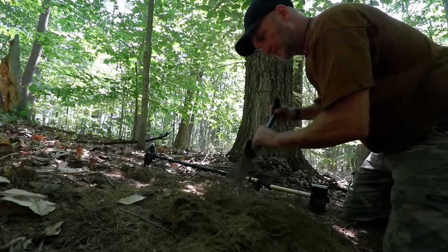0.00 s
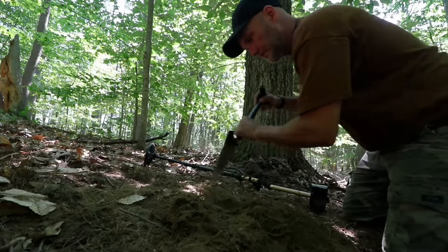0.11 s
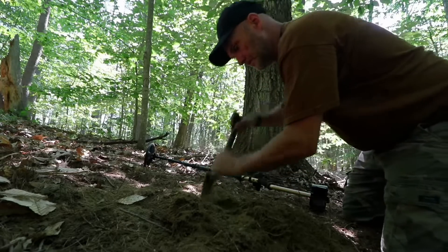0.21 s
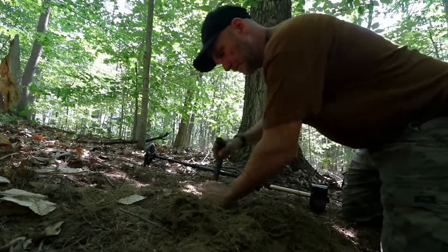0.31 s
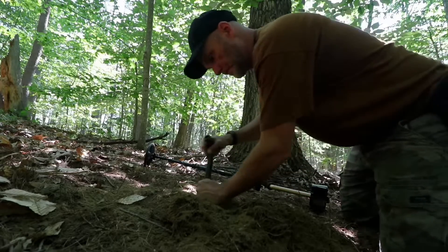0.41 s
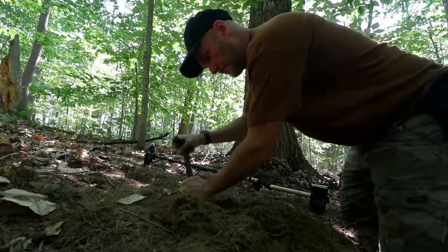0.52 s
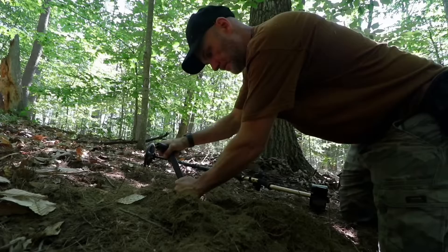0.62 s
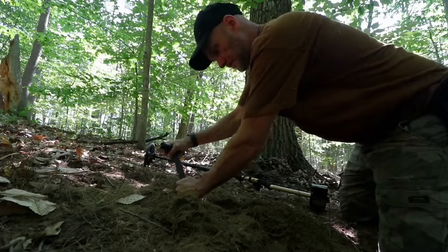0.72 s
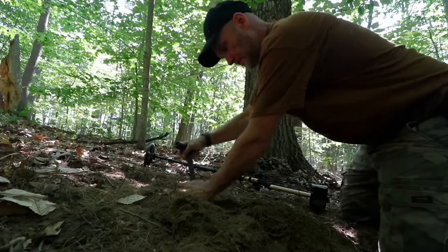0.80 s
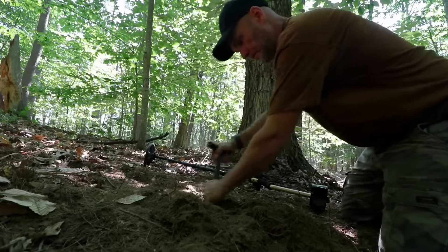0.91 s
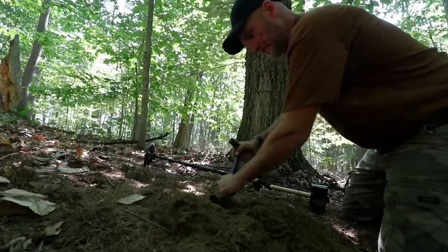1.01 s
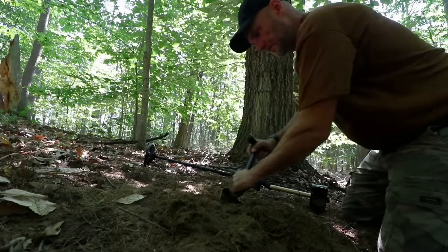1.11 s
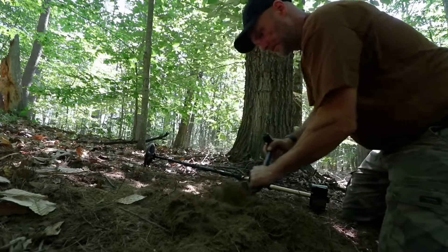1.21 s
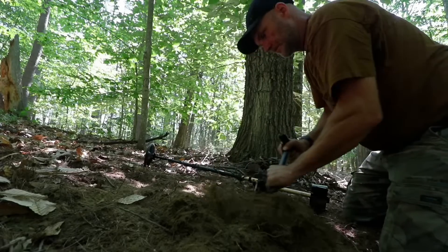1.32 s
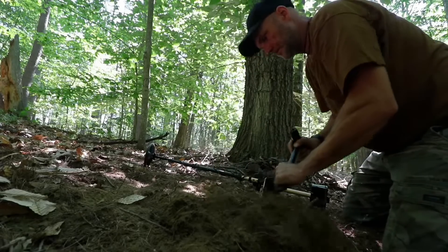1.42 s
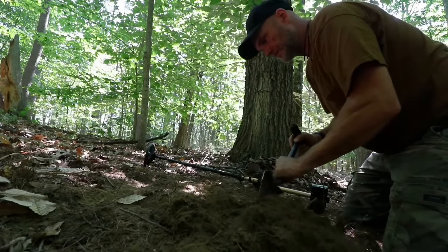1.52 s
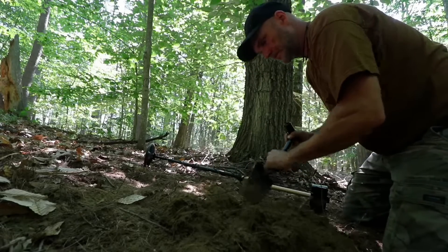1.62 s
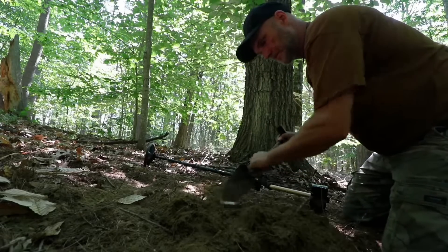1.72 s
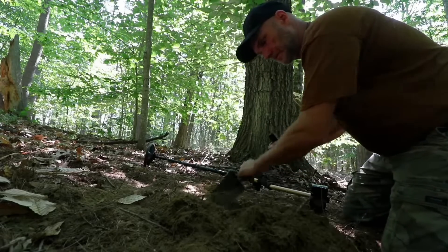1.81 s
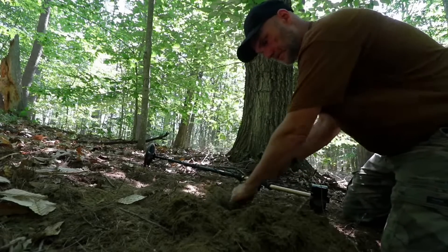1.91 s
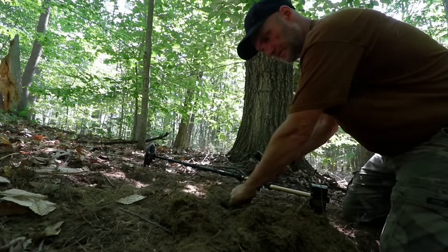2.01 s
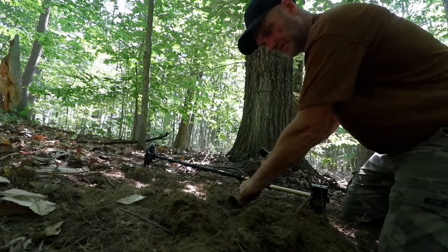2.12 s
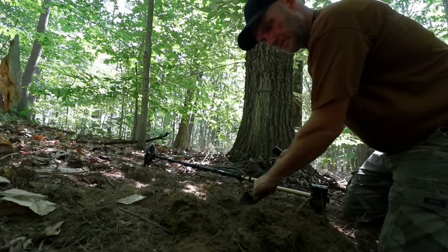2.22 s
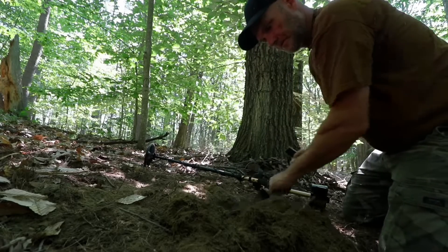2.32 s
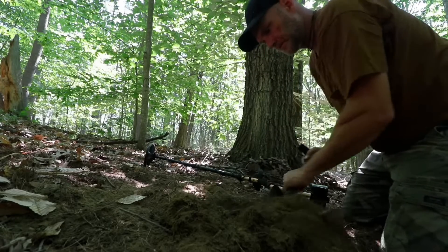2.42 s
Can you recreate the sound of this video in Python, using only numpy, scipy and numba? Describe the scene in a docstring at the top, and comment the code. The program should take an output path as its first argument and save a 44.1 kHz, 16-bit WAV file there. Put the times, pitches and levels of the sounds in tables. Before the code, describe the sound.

Steel blade hits glass and metal scraps in earth with a harsh double crack and thud, drags through crumbling grit with brief squeaks, then clinks again; close and dry outdoors, over faint leaf hush.

```python
"""Woodland soil full of glass and metal scraps, chopped and dragged through by a steel blade near a small
camera. Knocks pair a noise crack with damped blade and shard modes; chatters and grit are random clicks into
the same modes. Thuds and ticks are short sine swells, squeals narrow noise; two blade tones fade from the
stroke before. Filtered noise gives leaf hush, far drone, insects and wind. The camera hears almost in mono,
turns its gain down when loud and clips at full scale."""
import sys
import numpy as np
from scipy import signal
from scipy.fft import rfft, irfft
from scipy.io import wavfile
from numba import njit

SR = 44100
rng = np.random.default_rng(int(sys.argv[2]) if len(sys.argv) > 2 else 0)


def ratio(d):
    """dB to gain"""
    e = np.asarray(d, float) / 20
    return 10 ** e


def output_pcm(signal):
    """Save a mono or channel-first signal as 16-bit PCM at the path in sys.argv[1].

    Samples are clipped to [-1, 1] before scaling.
    """
    pcm = np.clip(np.atleast_2d(signal).T, -1, 1) * 32767
    wavfile.write(sys.argv[1], SR, np.round(pcm).astype(np.int16))


N = 110250


def unit(x):
    """Scale to rms 1."""
    return x / np.sqrt(np.mean(x ** 2))


def colour(x, table):
    """Minimum-phase filter through (hz, db) points, by folded cepstrum."""
    hz, db = np.array(table, float).T
    bin_hz = np.arange(2049) * SR / 4096
    log_gain = np.interp(np.log(bin_hz + 1), np.log(hz), db) * np.log(10) / 20
    cepstrum = irfft(log_gain)
    cepstrum[1:2048] *= 2
    cepstrum[2049:] = 0
    impulse = irfft(np.exp(rfft(cepstrum)))
    return signal.fftconvolve(x, impulse)[:len(x)]


def band(x, hz, width_hz):
    """One resonance."""
    return signal.lfilter(*signal.iirpeak(hz, hz / width_hz, fs=SR), x)


def grains(per_s, spread_db, size=N):
    """Random clicks whose sizes have a long tail."""
    hit = rng.random(size) < per_s / SR
    size_gain = ratio(spread_db * rng.exponential(size=size))
    return hit * rng.standard_normal(size) * size_gain


def curve(table, column):
    """A dB column as gain over time."""
    points = np.array(table)
    return ratio(np.interp(np.arange(N) / SR, points[:, 0], points[:, column]))


def add(out, start_s, x):
    """Mix x in from start_s."""
    i = max(int(start_s * SR), 0)
    out[i:i + len(x)] += x[:N - i]


def decay(t, t60_s):
    """Exponential fade, 60 dB in t60_s."""
    return np.exp(-np.log(1000) * t / t60_s)


# leaf hush spectrum: hz [Hz], density_db [relative dB per Hz]
HUSH_SPECTRUM = [(25, -21.5), (107, -4.5), (523, -13.5), (2420, -21.5), (3440, -19.5), (5140, -34.5),
                 (15500, -37)]
# wind on the microphone: time_s [s], level_db [dB rms]
WIND_LEVEL = [(0, -93), (.25, -41), (.8, -62), (1.05, -44), (1.6, -65), (2.2, -43.5), (2.5, -57)]


def forest():
    """Leaf hush, a far drone, a thin insect band and low wind rumble, all filtered noise."""
    noise = rng.standard_normal((4, N))
    hush = ratio(-47) * unit(colour(noise[0], HUSH_SPECTRUM))
    drone = ratio(-54) * unit(band(noise[1], hz=86, width_hz=15))
    insects = ratio(-60.5) * unit(band(noise[2], hz=3400, width_hz=37))
    rumble_band = signal.butter(2, [22, 55], "band", fs=SR, output="sos")
    wind = curve(WIND_LEVEL, column=1) * unit(signal.sosfilt(rumble_band, noise[3]))
    return hush + drone + insects + wind


# blade tones left from the stroke before: pitch_hz [Hz], level_db [dB peak], t60_s [s]
AFTER_TONES = [(2560, -41, 0.27), (2210, -46, 0.15)]


def after_ring():
    """Two blade tones dying away exponentially."""
    t = np.arange(N) / SR
    out = np.zeros(N)
    for pitch_hz, level_db, t60_s in AFTER_TONES:
        out += ratio(level_db) * decay(t, t60_s) * np.sin(2 * np.pi * pitch_hz * t)
    return out


# mode pitches, blade plus a struck glass or metal shard (1655, 2360, 3150, 3970 Hz): pitch_hz [Hz]
MODE_HZ = [850, 1320, 1550, 1655, 2210, 2360, 2450, 2600, 3150, 3230, 3465, 3970, 4060, 4560, 5030, 5930,
           6610, 7800, 8200, 9300, 11100, 13400]
# per mode: edge_db [dB, struck on the edge], face_db [dB, struck on the face], t60_s [s, free]
MODE_RESPONSE = [(-5.5, -3.5, 0.014), (-14, -7, 0.29), (-11, 1, 0.23), (-1.5, -1, 0.094), (-9, -4.5, 0.23),
                 (-5, -29, 0.054), (-5, -2.5, 0.09), (-5.5, -3, 0.039), (2, -14, 0.051), (-9.5, -7, 0.19),
                 (-2.5, -3.5, 0.29), (-0.5, -48, 0.18), (-4, -30.5, 0.8), (-20, 0.5, 0.25),
                 (-8.5, -15, 0.16), (-11.5, -10.5, 0.088), (-2, -17.5, 0.17), (-12, -49, 0.2),
                 (-5.5, -32, 0.14), (-1, -58, 0.088), (-19.5, -29.5, 0.066), (-18, -27, 0.015)]
MODE_SCATTER_DB, FAVOUR_DB, FAVOUR_OCTAVES = 2.5, 14, 0.16


def ring(face, held_s, tilt_db_per_oct=0, favour_hz=0):
    """Blade and shard modes after one click; soil and hand add their damping to the steel's own."""
    hz = np.array(MODE_HZ, float)[:, None]
    edge_db, face_db, free_s = np.array(MODE_RESPONSE, float).T[:, :, None]
    t = np.arange(SR // 5) / SR
    db = (1 - face) * edge_db + face * face_db + tilt_db_per_oct * np.log2(hz / 3000)
    db = db + MODE_SCATTER_DB * rng.standard_normal(hz.shape)
    if favour_hz:
        octaves = np.log2(hz / favour_hz)
        db = db + FAVOUR_DB * np.exp(-0.5 * (octaves / FAVOUR_OCTAVES) ** 2)
    t60_s = 1 / (1 / free_s + 1 / max(held_s, 0.003))
    phase_cycles = rng.random(hz.shape)
    modes = ratio(db) * decay(t, t60_s) * np.sin(2 * np.pi * (hz * t + phase_cycles))
    return np.sum(modes, axis=0) / np.sqrt(np.sum(ratio(db) ** 2))


def crack(tilt_db_per_oct, size):
    """Broad noise of breaking grit; tilt and a fixed slope shape it above 3 kHz."""
    low_hz, slope_db_per_oct = 480, -8.5
    top_db = np.log2(16 / 3) * (tilt_db_per_oct + slope_db_per_oct)
    spectrum = [(low_hz / 8, -18), (low_hz, 0), (3000, 0), (16000, top_db)]
    return unit(colour(rng.standard_normal(size), spectrum))


CHATTER_FACE = 0.25  # face share for dragged and chattering contact

# drag through the soil: time_s [s], rasp_db [dB rms of grit, ring excluded], earth_db [dB rms]
DRAG_LEVEL = [(0, -55, -62), (.27, -51.5, -57), (.37, -46, -66), (.46, -48.5, -41.5), (.58, -48, -39.5),
              (.66, -56.5, -59.5), (.77, -57, -50), (.8, -43, -38.5), (.88, -47.5, -44),
              (.97, -52.5, -48.5), (1.02, -40.5, -31.5), (1.07, -47, -40), (1.16, -40, -33.5),
              (1.23, -47, -38), (1.29, -52, -48.5), (1.33, -46.5, -42.5), (1.41, -52, -49.5),
              (1.45, -37, -64), (1.55, -39.5, -56), (1.63, -47, -51), (1.87, -60, -56), (1.94, -42, -37),
              (2.02, -51.5, -48), (2.1, -40, -40), (2.24, -48.5, -37), (2.3, -52.5, -45),
              (2.42, -53.5, -43), (2.5, -53, -57)]
# grit spectrum: hz [Hz], density_db [relative dB per Hz]
GRIT_SPECTRUM = [(240, -43), (500, -4.5), (1500, -1.5), (4000, -2.5), (7000, -10), (15500, -22.5)]
# crumbling earth spectrum: hz [Hz], density_db [relative dB per Hz]
EARTH_SPECTRUM = [(35, -47), (60, -7.5), (199, 2.5), (471, -7.5), (911, -7), (3300, -120)]


def drag():
    """Grit clicks rasp and ring the buried blade; slower clicks make earth crumble below it."""
    grit = grains(per_s=7000, spread_db=1.8)
    blade = unit(signal.fftconvolve(grit, ring(CHATTER_FACE, held_s=0.026))[:N])
    rasp = unit(colour(grit, GRIT_SPECTRUM)) + ratio(-5) * blade
    earth = unit(colour(grains(per_s=1500, spread_db=2.0), EARTH_SPECTRUM))
    return curve(DRAG_LEVEL, column=1) * rasp + curve(DRAG_LEVEL, column=2) * earth


def bumps(table, rise_cycles):
    """Sine swells, each envelope peaking at 1 after rise_cycles of its pitch."""
    out, t = np.zeros(N), np.arange(SR // 10) / SR
    for start_s, peak_db, pitch_hz in table:
        u = t * pitch_hz / rise_cycles
        envelope = np.e * u * np.exp(-u)
        add(out, start_s, ratio(peak_db) * envelope * np.sin(2 * np.pi * pitch_hz * t))
    return out


# small scraps clicking together: start_s [s], peak_db [dB, envelope], pitch_hz [Hz]
TICK_EVENTS = [(.8008, -27.5, 3300), (.8200, -28, 2050), (.8475, -30.5, 3400), (.8515, -29, 1930),
               (.864, -31, 1800), (.8685, -31, 1970), (.868, -33, 3420), (1.012, -30, 3020)]


def ticks():
    """Scraps click as swells a few cycles long."""
    return bumps(TICK_EVENTS, rise_cycles=2.25)


# rubbing that sets one mode singing: start_s [s], length_s [s], pitch_hz [Hz], level_db [dB rms before fades]
SQUEAL_EVENTS = [(1.078, 0.029, 1650, -37), (1.079, 0.036, 2600, -33.5), (1.076, 0.042, 3220, -30.5),
                 (1.088, .024, 3420, -32), (1.514, 0.081, 2220, -38.5), (1.2, 0.078, 1900, -46),
                 (2, 0.048, 570, -45)]


def squeals():
    """Rubbing noise through one narrow resonance each."""
    out = np.zeros(N)
    for start_s, length_s, pitch_hz, level_db in SQUEAL_EVENTS:
        n = int(length_s * SR)
        settled = band(rng.standard_normal(SR // 5), pitch_hz, width_hz=30)[-n:]
        add(out, start_s, ratio(level_db) * unit(settled) * signal.windows.tukey(n, 0.4))
    return out


# shard skidding along the blade: start_s [s], length_s [s], level_db [dB rms of ring],
# favour_hz [Hz, pitch most excited], tilt_db_per_oct [dB/octave]
CHATTER_EVENTS = [(1.037, 0.016, -31, 2870, -5.5), (1.077, 0.034, -37, 5440, 18),
                  (1.887, 0.065, -37.5, 2200, 4.5), (2.099, 0.043, -40.5, 2360, -7),
                  (2.149, 0.044, -36.5, 1590, 0.5), (2.266, 0.0084, -37, 16000, 12)]


def chatters():
    """Quick runs of clicks into the blade and shard modes, with grit breaking under them."""
    out = np.zeros(N)
    for start_s, length_s, level_db, favour_hz, tilt_db_per_oct in CHATTER_EVENTS:
        n = int(length_s * SR)
        shape = signal.windows.tukey(n, 0.35) * np.linspace(1, 0.7, n)
        clicks = grains(per_s=3500, spread_db=1.2, size=SR // 10)[:n] * shape
        blade = ring(CHATTER_FACE, 0.0089, tilt_db_per_oct, favour_hz)
        x = signal.fftconvolve(clicks, blade)
        add(out, start_s, ratio(level_db) * x / np.sqrt(np.mean(x[:n] ** 2) + 1e-12))
        grit = crack(tilt_db_per_oct, size=SR // 10)[:n] * shape
        add(out, start_s, ratio(level_db - 10) * grit)
    return out


# blade and clods on the ground: start_s [s], peak_db [dB, envelope], pitch_hz [Hz]
THUD_EVENTS = [(.236, -23, 406), (.259, -17, 170), (0.282, -19.5, 119), (.8015, -31, 820),
               (.821, -24.5, 830), (1.012, -21, 536), (1.02, -19.5, 292), (1.043, -21.5, 285),
               (1.172, -20.5, 420), (1.401, -26, 483), (1.896, -29, 232), (1.911, -22, 443),
               (2.103, -25, 171), (2.226, -27, 171), (2.234, -21.5, 283), (2.247, -29, 80)]


def thuds():
    """Ground motion as a swell about a cycle long."""
    return bumps(THUD_EVENTS, rise_cycles=0.555)


# blade on scraps: start_s [s], strength_db [dB, before ring and crack offsets], face [share 0-1],
# held_s [s, t60 imposed by soil and hand], tilt_db_per_oct [dB/octave]
KNOCK_EVENTS = [(0.061, -33, 0.3, 0.59, 10.5), (0.2387, 9.5, 0.14, 0.045, 4), (0.248, 6, 0.18, 0.054, 1.5),
                (.261, -9, 0.85, 0.044, 0), (0.8206, -20.5, 0.4, 0.027, -5), (1.0264, -8, 0.8, 0.021, -18),
                (1.031, -8.5, 0.72, 0.017, -5), (1.1716, -2.5, 0.37, 0.017, -1.5),
                (1.205, -20, 0.3, 0.011, -6), (1.402, -21, 0.66, 0.0095, -16), (1.515, -19, 0.6, 0.013, 0),
                (1.8846, -25.5, 0.54, 0.057, 11), (1.9105, 2, 1, 0.057, 0), (1.9161, 0, 0.93, 0.07, -2),
                (1.933, -9.5, 0.3, .03, -4), (1.948, -14.5, 0.56, 0.062, -1), (2.061, -21.5, 0.9, 0.14, -9),
                (2.091, -13.5, 0.64, 0.095, -7.5), (2.097, -21, 0.37, 0.035, 19),
                (2.176, -20.5, 0.6, 0.02, 2), (2.223, -14, 0.78, 0.055, -4.5)]
RING_DB, CRACK_DB, CRACK_T60_S = -8.0, -8.5, 0.013
FACE_CRACK_DB, FACE_DULL_DB_PER_OCT = -4, -3  # flat blows crack softer and duller


def knocks():
    """Each knock: a broad crack and the damped ring of blade and shard."""
    out, t = np.zeros(N), np.arange(SR // 20) / SR
    for start_s, strength_db, face, held_s, tilt_db_per_oct in KNOCK_EVENTS:
        add(out, start_s, ratio(strength_db + RING_DB) * ring(face, held_s, tilt_db_per_oct))
        crack_db = strength_db + CRACK_DB + face * FACE_CRACK_DB
        burst = crack(tilt_db_per_oct + face * FACE_DULL_DB_PER_OCT, size=len(t))
        add(out, start_s, ratio(crack_db) * burst * decay(t, CRACK_T60_S))
    return out


def scene():
    """All sources in the middle; faint hiss of opposite sign in the two microphone ports."""
    background = forest() + after_ring() + drag()
    scraps = ticks() + squeals() + chatters()
    mid = background + scraps + thuds() + knocks()
    hiss = ratio(-66.5) * rng.standard_normal(N)
    return np.array([mid + hiss, mid - hiss])


@njit
def follow(x, attack, release):
    """One-pole level follower with separate rise and fall rates per sample."""
    level, out = 0., np.empty(len(x))
    for i in range(len(x)):
        level += (x[i] - level) * (attack if x[i] > level else release)
        out[i] = level
    return out


def band_limit(x):
    """A steep low-pass at the top of the band."""
    return signal.sosfilt(signal.butter(12, 15650, fs=SR, output="sos"), x)


DUCK_FROM_DB, DUCK_RATIO, DUCK_ATTACK_S, DUCK_RELEASE_S = -28.5, 1.4, 0.026, 0.16
CLIP, TOP_HZ = 1, 15700


def record(dry):
    """Gain falls as the followed level rises, the converter clips, the top is cut."""
    level = follow(np.abs(dry).max(axis=0), 1 / (DUCK_ATTACK_S * SR), 1 / (DUCK_RELEASE_S * SR))
    gain = np.minimum(1, ratio(DUCK_FROM_DB) / (level + 1e-9)) ** (1 - 1 / DUCK_RATIO)
    clipped = np.clip(dry * gain, -CLIP, CLIP)
    lowpass = signal.ellip(8, 0.2, 70, TOP_HZ, fs=SR, output="sos")
    mix = signal.sosfilt(lowpass, clipped)
    return band_limit(mix)


dry = scene()
out = record(dry)
output_pcm(out)
```